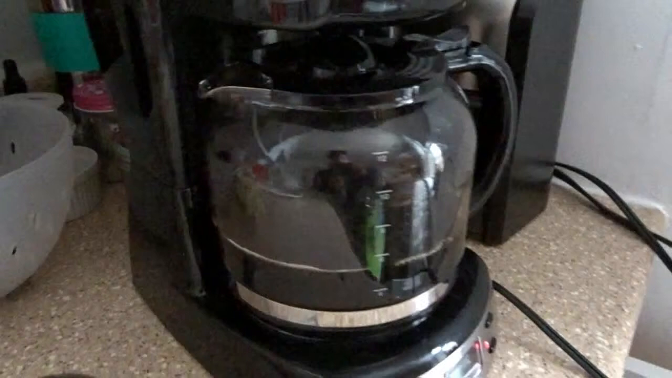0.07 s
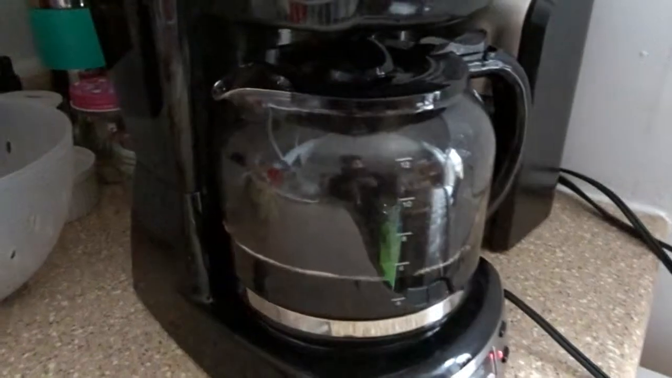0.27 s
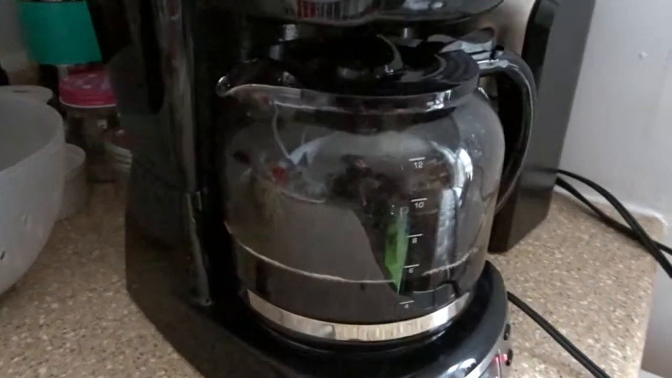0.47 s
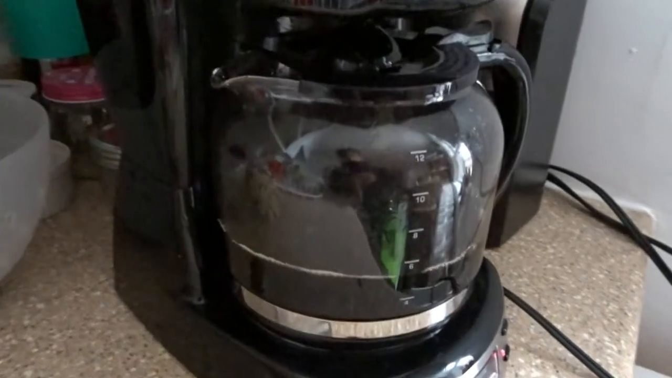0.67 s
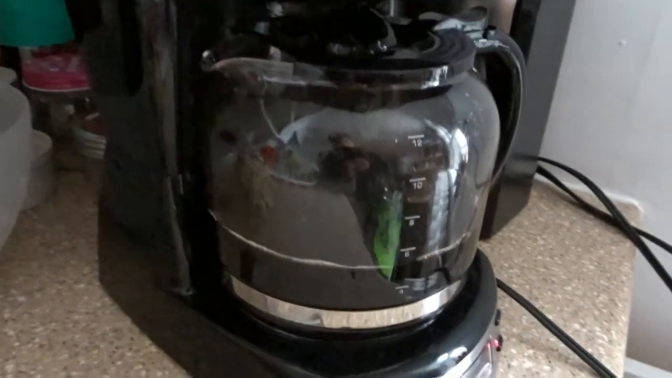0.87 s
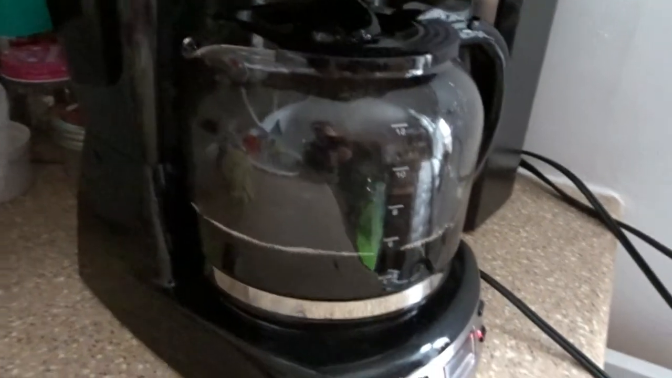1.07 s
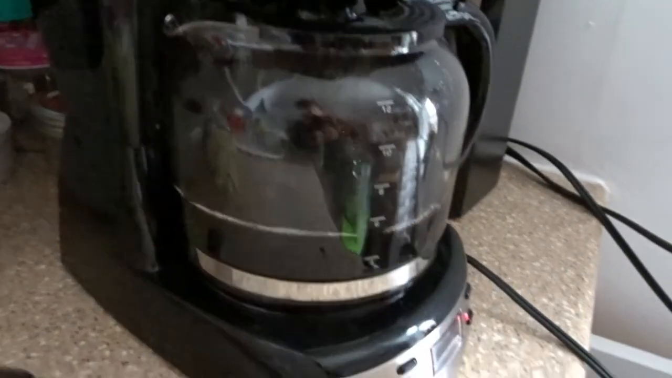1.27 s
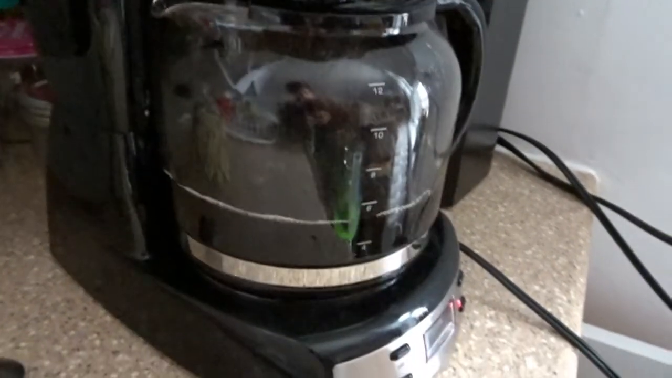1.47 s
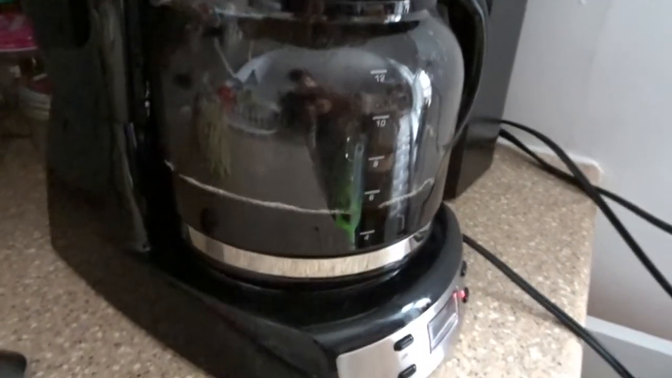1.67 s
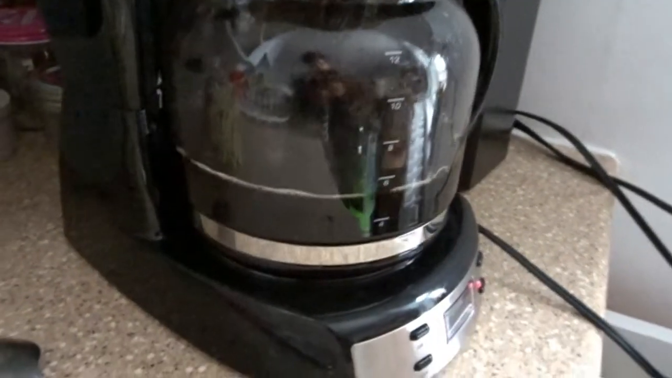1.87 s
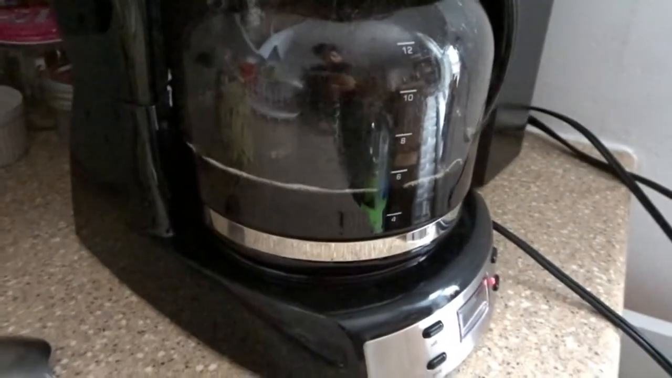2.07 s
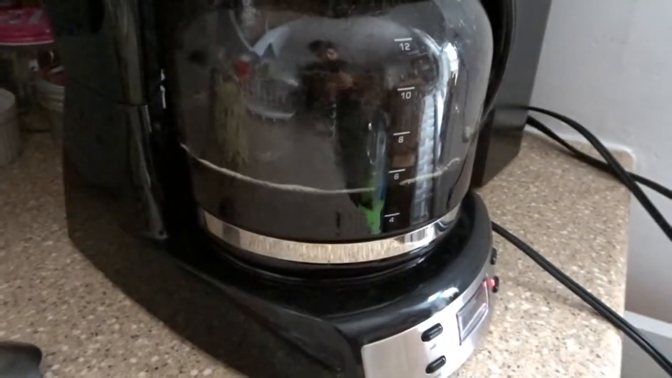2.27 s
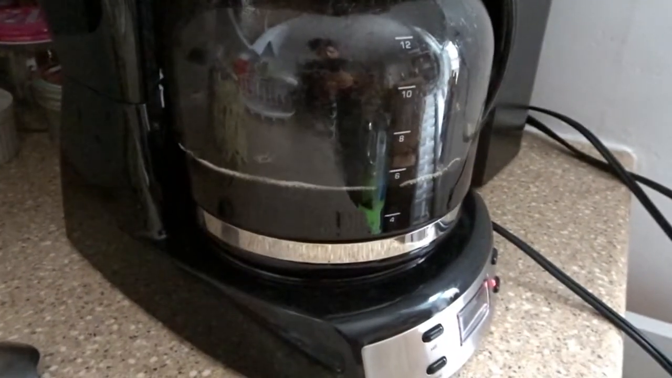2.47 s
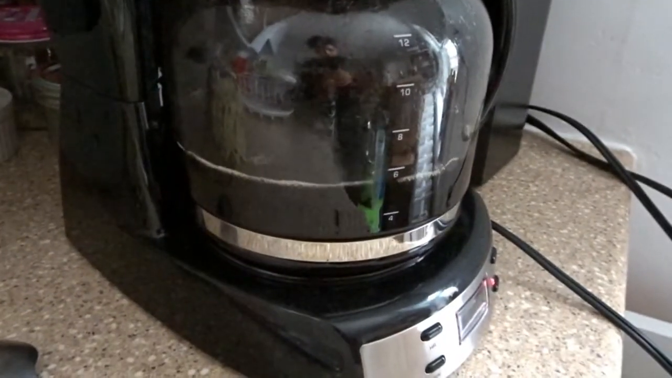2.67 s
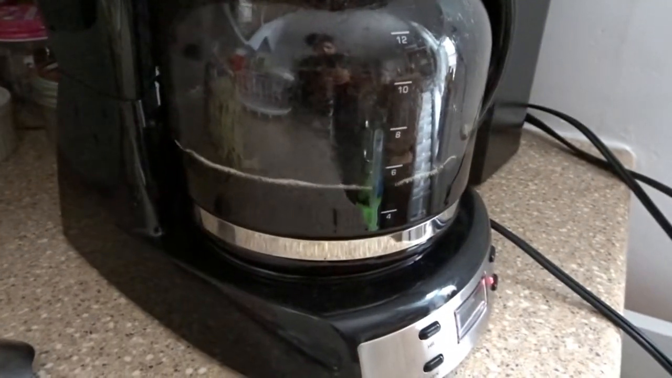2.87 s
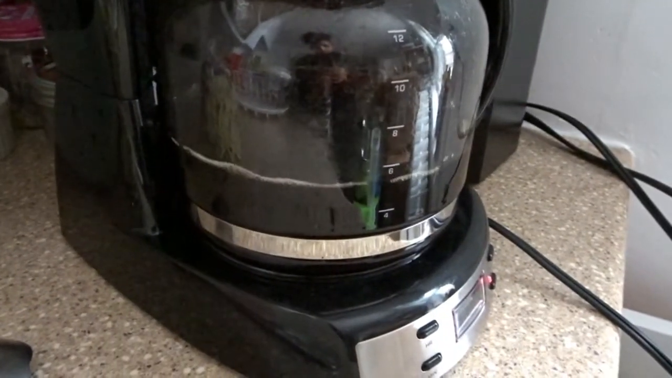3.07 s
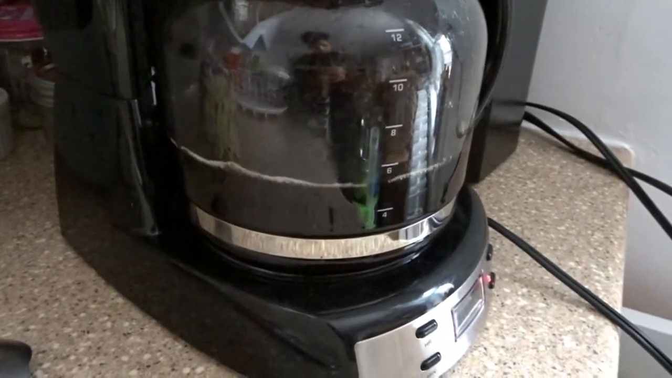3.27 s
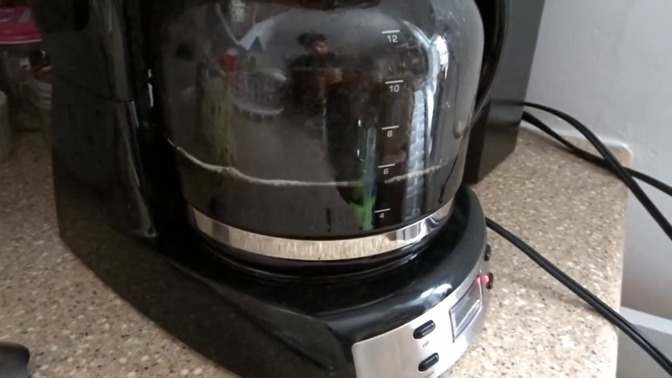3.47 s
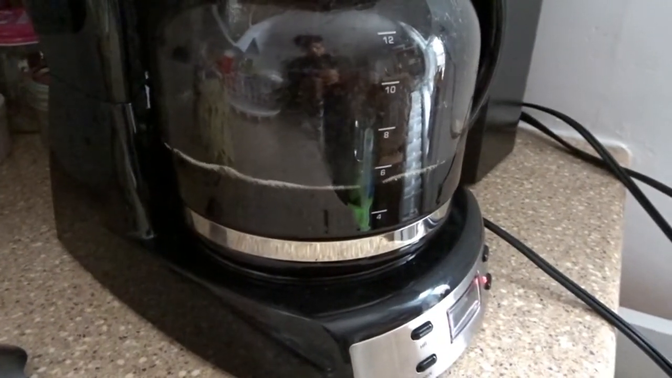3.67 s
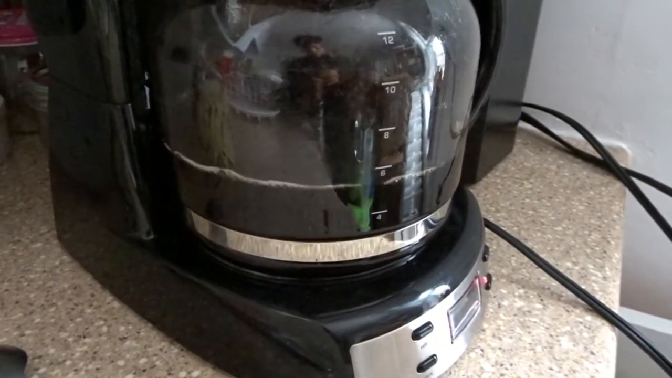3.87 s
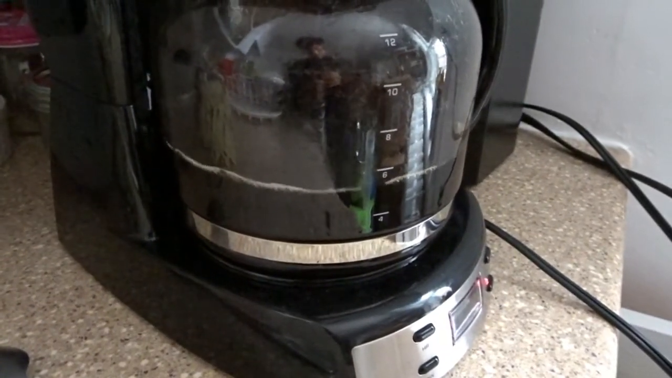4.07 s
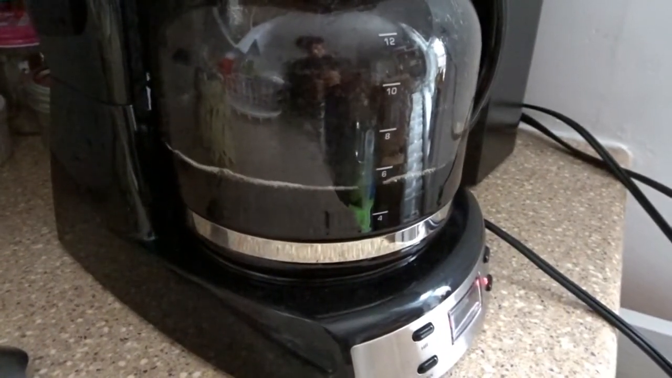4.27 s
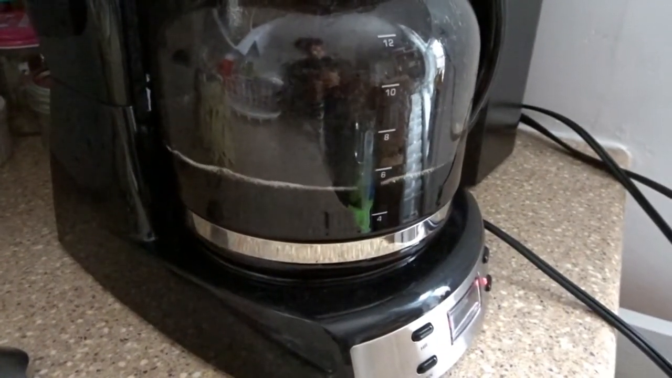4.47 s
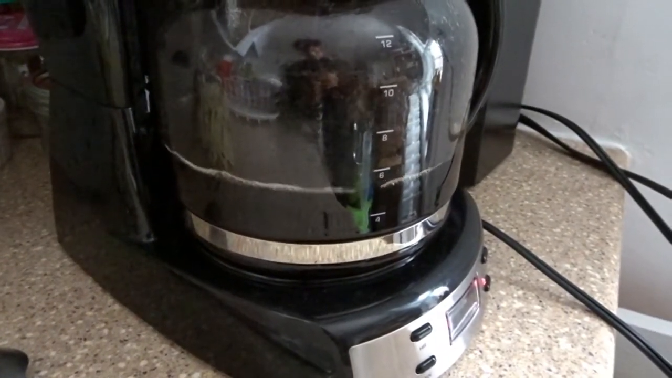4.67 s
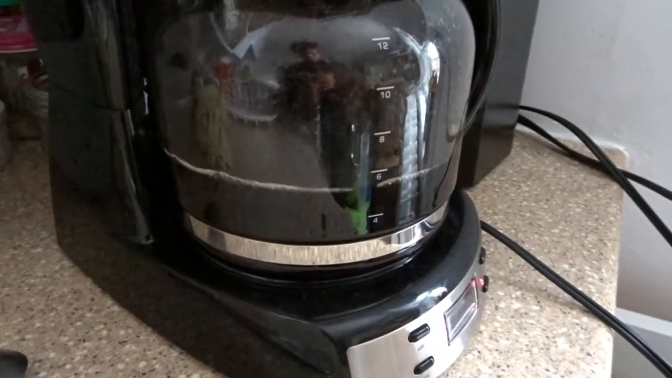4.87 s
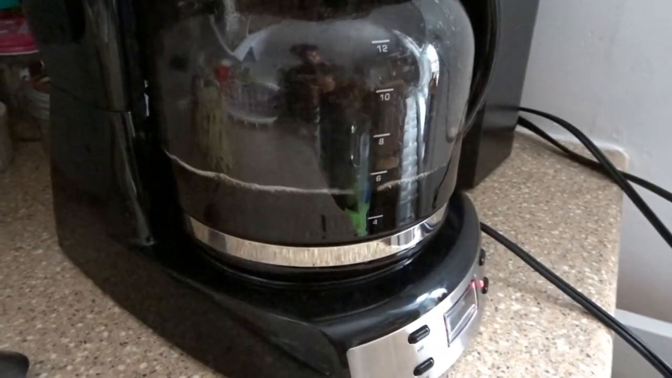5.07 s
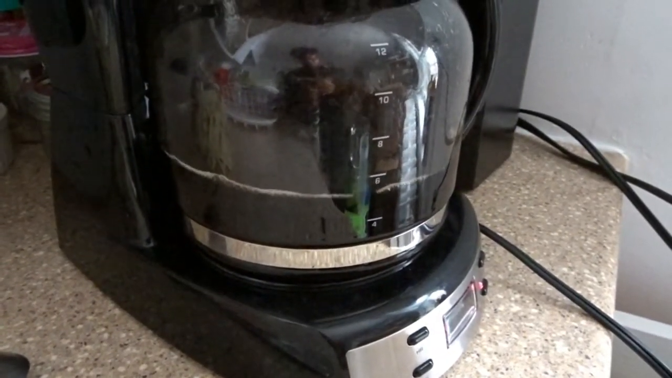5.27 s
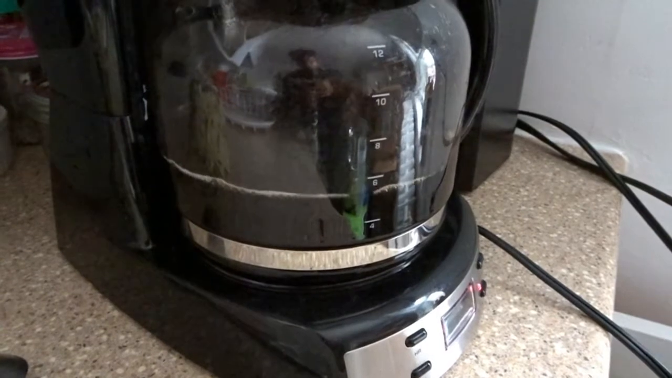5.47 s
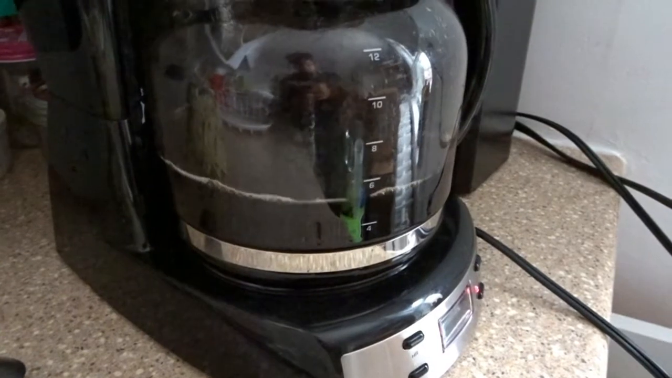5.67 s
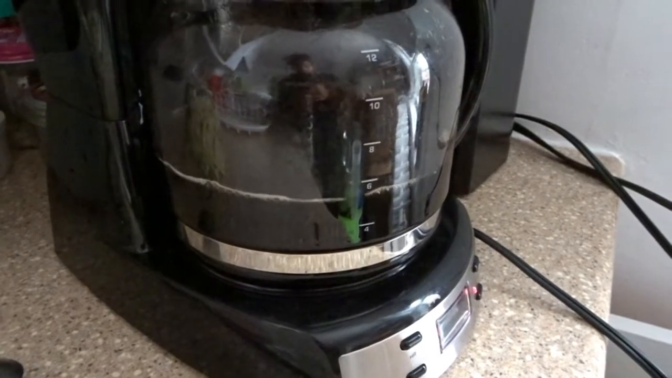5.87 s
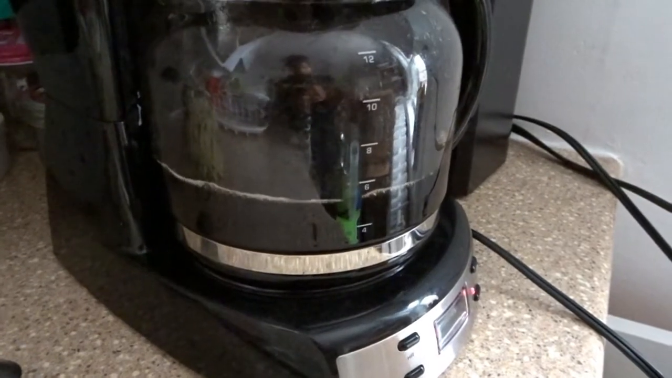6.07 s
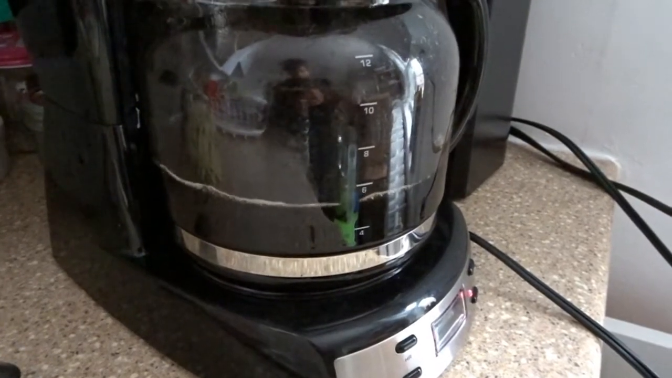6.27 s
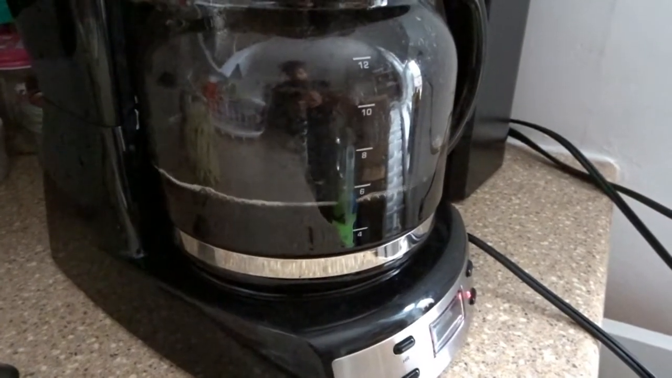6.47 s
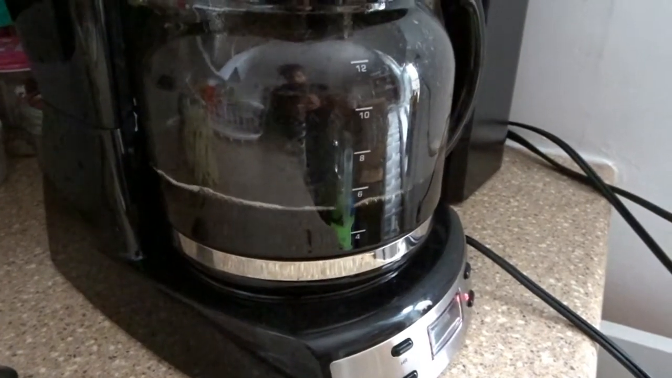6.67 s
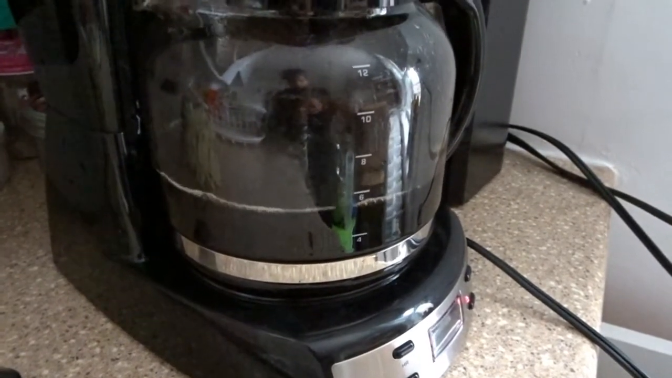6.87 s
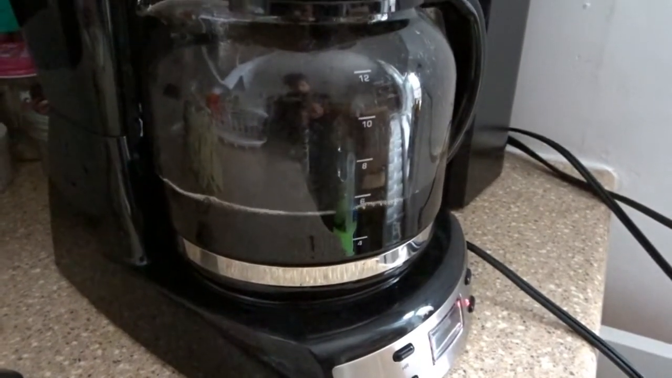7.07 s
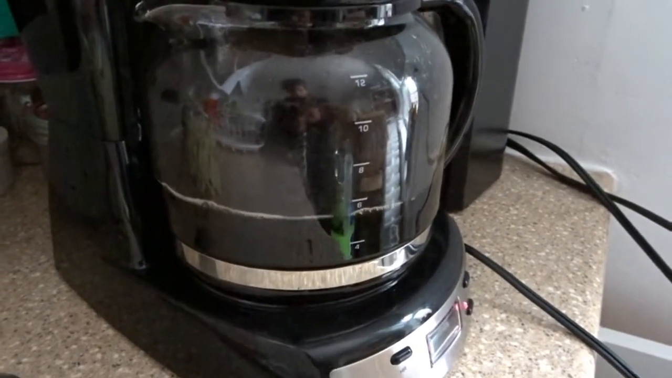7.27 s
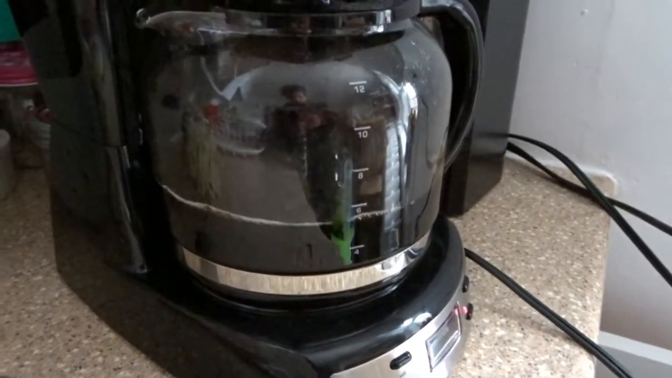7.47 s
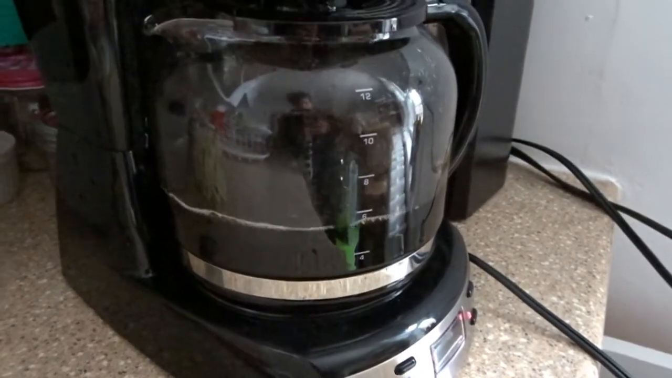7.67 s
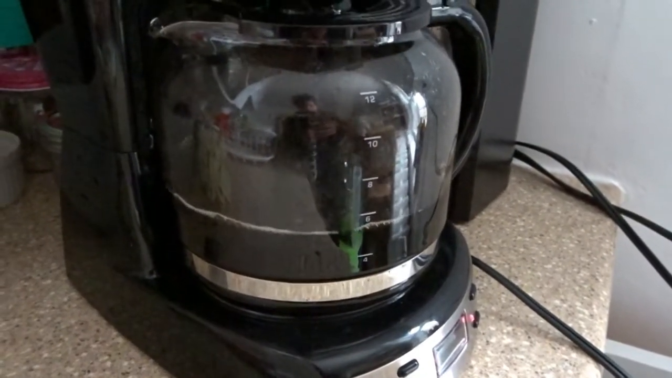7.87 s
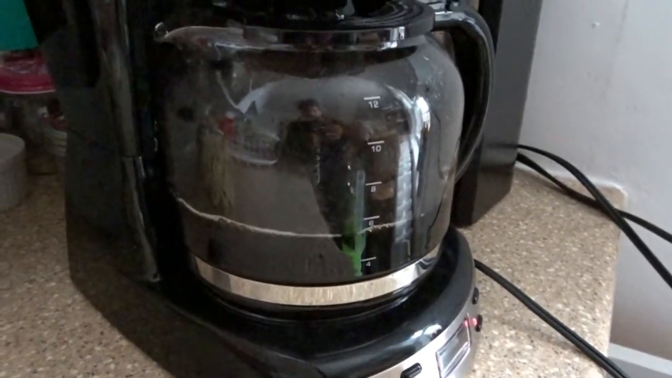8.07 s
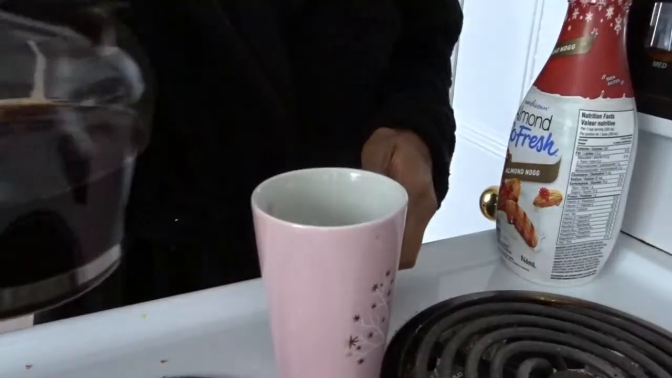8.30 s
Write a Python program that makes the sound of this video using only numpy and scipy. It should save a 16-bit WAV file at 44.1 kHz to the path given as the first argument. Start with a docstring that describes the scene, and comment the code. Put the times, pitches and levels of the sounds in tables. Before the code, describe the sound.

A drip coffee maker is brewing close to the microphone on a kitchen counter, with very little echo. A low, churning boil resonates in its hollow plastic housing from the start and slowly grows a little louder. Sharp, knocking pops cluster between 0.5 and 1.5 seconds, with soft glugs underneath. Small drips plink into the carafe and droplets make faint high spits throughout. From about 2.2 seconds, short steam puffs join in. A fine sizzle swells around 3.2 seconds, leading to a strong pop at 3.6. From 4 seconds a thin steam hiss rises and the glugs and puffs come thickly. The sizzle swells again, with a hard pop at 5.2 and the loudest at 5.5. After 6 seconds the sputtering eases to drips and soft glugs over the drone and hiss. At 8.1 seconds the machine cuts off abruptly, leaving a moment of quiet, rumbling room tone.

```python
"""A low, churning drone with sharp pops and soft glugs: a drip coffee maker brewing on a kitchen counter,
close to a small stereo microphone. Steam bubbles collapse in the heater tube and shake the hollow
plastic housing at its resonances. Steam hisses up the riser and puffs under the lid; droplets spit on
hot parts and plink into the carafe. At the end the sound cuts off abruptly; a room tone with louder
low rumble follows the cut."""
import sys
import numpy as np
from scipy import signal
from scipy.fft import rfft, irfft, next_fast_len
from scipy.io import wavfile
from scipy.ndimage import uniform_filter1d, map_coordinates

SR = 44100
rng = np.random.default_rng(int(sys.argv[2]) if len(sys.argv) > 2 else 0)


def int16_out(signal):
    """Quantize to a 16-bit WAV file."""
    q = np.round(np.clip(np.atleast_2d(signal).T, -1, 1) * 32767)
    wavfile.write(sys.argv[1], SR, q.astype(np.int16))


N = 367529
START_S, CUT_S = 0.074, 8.112  # fade-in; abrupt cut to room tone

# resonances of the machine's parts: freq_hz, width_hz, gain_db
BASE_MODES = [(50, 29, -14.5), (111.8, 22, -4.5), (153, 32, -6), (223.5, 9.9, -8)]
TANK_MODES = [(296, 32, 0), (255, 40, -12)]
WALL_MODES = [(639, 32, 3), (699, 59, -4.5), (759, 28.5, -8.5), (960, 41.6, -8.5), (1055, 48, -10),
              (1264, 58, -12), (1436.5, 41, -5), (1626, 18, -24.5)]
LID_MODES = [(1848, 33.6, 4), (1988, 20, 2.5), (2386, 200, 1), (2630, 126, 4.5), (2813, 42, 5.5),
             (3590, 30, -1.5), (3850, 200, -10.5), (4344, 190, -2), (4510, 46, -3), (4580, 14, 6.5),
             (4780, 64, 0), (4950, 220, -2), (5400, 98, -5.5), (5630, 24, -0.5)]
RISER_MODES = [(1428.6, 42, 3), (1615, 15, -11), (2612, 36, -10), (3820, 130, -27), (4670, 31, -33),
               (5026, 74, -16), (5450, 116, -17.5)]
MOUTH_MODES = [(6570, 150, -3.5), (6750, 110, 0), (6980, 154, 0)]
SPRAY_HEAD_MODES = [(8520, 200, -5.5), (9100, 270, -3.5), (10800, 160, -9)]
LEAK_MODES = [(4536, 70, 0), (5280, 70, -12), (5750, 52, -10)]
THUD_MODES = [(464, 130, -20), (960, 680, 5.5), (1910, 250, 1.5), (3420, 5000, -29)]  # first instants of a blow, before the ringing forms
FROTH_MODES = [(924, 51, -1.5), (1080, 104, -3), (2520, 750, -15), (4250, 3500, -25)]
# bands the housing radiates poorly: freq_hz, width_hz, share_removed
NOTCHES = [(391, 125, 0.54), (726, 21, 0.57), (2246, 200, 0.05), (2830, 240, 0.44), (4245, 205, 0.7),
           (6100, 350, 0)]

# room noise spectrum: freq_hz, density_db
ROOM_SPECTRUM = [(24, -48), (40, -30), (52, -22), (100, -17), (140, -10), (200, -15), (450, -22),
                 (900, -26.5), (2000, -29.5), (12000, -50), (15500, -59)]
# steady boiling: time_s, walls_db, base_db, tank_db
BOIL_LEVELS = [(0.25, -52, -60, -49.5), (0.38, -48.5, -53, -49.5), (1.02, -48.5, -51, -46.5),
               (1.56, -49.5, -52, -48.5), (2.45, -47.5, -49, -47), (2.66, -47, -54.5, -49),
               (3.64, -46.5, -51.5, -45.5), (5.93, -42.5, -47.5, -44), (6.66, -44, -47.5, -45.5),
               (7.31, -43, -49.5, -46.5), (7.91, -44, -47.5, -44.5), (8.0, -46.5, -49, -44.5)]
# steam hiss: time_s, mouth_db, spray_head_db, leak_db
HISS_LEVELS = [(0.2, -75, -87, -61.5), (1.5, -76, -81, -69), (2.7, -79, -81, -72), (4.0, -68, -80, -80),
               (4.25, -63.5, -67, -76), (5.2, -66.5, -71.5, -80), (5.75, -60.5, -64.5, -76),
               (6.3, -64, -73, -78), (8.0, -61, -77, -83)]
# droplets on hot parts: start_s, level_db, centre_hz
SPIT_EVENTS = [(0.127, -52, 7250), (.3501, -50, 11000), (1.1139, -57, 11000), (1.4287, -46, 9800),
               (1.7744, -51, 8400), (1.986, -54, 8000), (2.37, -42.5, 8160), (2.4184, -48, 9500),
               (2.54, -45.5, 10100), (3.282, -52, 9600), (3.6501, -49, 7900), (3.939, -47.5, 9000),
               (4.0667, -46.5, 10000), (4.16, -45, 8800), (4.1994, -51, 10000), (4.5594, -59, 9000),
               (4.7037, -48, 10000), (5.666, -37.5, 7760), (5.7997, -46.5, 8000), (5.9668, -43, 8050),
               (6.7564, -58, 9000), (6.9222, -50, 9100), (7.005, -52, 8500), (7.1094, -52, 7600),
               (7.241, -44, 7750), (7.9553, -54, 10000)]
# drops into the carafe: start_s, level_db, pitch_hz
DRIP_EVENTS = [(0.165, -46, 3860), (.429, -37.5, 1020), (1.429, -32.5, 2500), (1.776, -38.5, 2800),
               (1.989, -47, 5710), (2.376, -36, 4430), (2.875, -40.5, 2380), (2.982, -42.5, 2510),
               (3.29, -48.5, 3090), (3.937, -40.5, 3690), (4.177, -42.5, 3080), (5.967, -28.5, 2445),
               (6.462, -35, 1015), (6.728, -43, 2750), (6.764, -34, 1584), (7.022, -39.5, 1650),
               (7.108, -42, 2660), (7.638, -43.5, 1950)]
# sharp bubble collapses: start_s, level_db, lid_vs_walls_db
POP_EVENTS = [(0.351, -35.5, -24), (0.471, -25, -11), (0.528, -20, -5), (0.631, -36.5, -5),
              (0.821, -39, -32), (0.916, -32.5, -37), (0.958, -26, -13), (0.997, -17.5, -11),
              (1.139, -25.5, -2), (1.458, -28, -7), (1.64, -36.5, -2), (2.209, -38, -13),
              (2.288, -37.5, -3), (2.468, -36, -1), (3.587, -17, 1), (3.686, -36, -6), (3.754, -46.5, 8),
              (3.824, -40, -21), (4.001, -44, -15), (4.159, -27, 0.5), (4.385, -34, -18), (4.471, -32, -12),
              (4.618, -32, -2), (4.899, -30.5, -5), (5.152, -32, -20), (5.225, -18.5, -10),
              (5.273, -28.5, -5), (5.455, -35, -31), (5.496, -14, 1.5), (5.578, -23.5, 1),
              (6.563, -36.5, -17), (7.956, -31, -8)]
# slugs of water: start_s, level_db, tank_vs_base_db
GLUG_EVENTS = [(0.354, -44.5, 9.5), (0.47, -36, -1), (0.526, -37, -1), (0.914, -34, 4.5), (0.994, -34, -14),
               (1.137, -38, 5), (1.459, -42, -7), (1.786, -43, 8), (2.434, -35.5, 2.5), (2.864, -37.5, -3),
               (3.033, -35, -1), (3.246, -40, -2), (3.453, -41, -6), (3.535, -34, -5), (3.585, -31, -15),
               (3.817, -35, -29), (3.895, -33.5, -7), (4.0, -34, -8), (4.156, -35.5, 6.5),
               (4.214, -35.5, -17), (4.379, -33.5, 2), (4.465, -30, -10), (4.562, -35, 4),
               (4.612, -32, -18), (4.664, -32.5, 3), (4.748, -40, -7), (4.811, -41, 5), (4.896, -32.5, -6),
               (4.973, -30.5, -11), (5.061, -36.5, -1), (5.145, -30, 1), (5.222, -33, -11),
               (5.265, -31, -21), (5.343, -36, -2), (5.41, -32, -18), (5.447, -37, -17), (5.495, -33, 1),
               (5.571, -32, -12), (5.639, -42, 3), (5.7, -36, 4.5), (5.8, -35, -3), (5.916, -37.5, -2),
               (6.435, -46, 12), (6.497, -43.5, 10.5), (6.854, -44.5, 13.5), (6.905, -41.5, 6.5),
               (7.233, -45, -5), (7.361, -38, -5), (7.394, -35, -12), (7.479, -39.5, 4), (7.545, -35, -6),
               (7.739, -34, -11), (7.799, -39, -3), (7.87, -43, -13), (7.949, -35, -13)]
# steam and spray under the lid: start_s, level_db
PUFF_EVENTS = [(0.6559, -40), (0.8405, -46), (2.2468, -43), (2.3191, -42), (2.4394, -35), (2.5331, -38),
               (2.6858, -47), (2.8424, -40), (3.0694, -38), (3.1193, -44), (3.1594, -41), (3.5204, -46),
               (3.7015, -40), (3.7529, -42), (3.8207, -45), (3.8514, -47), (3.901, -45), (4.2178, -37),
               (4.3844, -39), (4.4694, -40), (4.4987, -39), (4.5605, -33), (4.6124, -36), (4.6633, -36),
               (4.8274, -43), (4.8993, -42), (4.9786, -33), (5.1422, -38), (5.2669, -34), (5.3494, -37),
               (5.4151, -40), (5.7254, -33), (5.8067, -37), (6.0247, -36)]
# sizzling before the big pops: centre_s, half_length_s, level_db
SIZZLE_SWELLS = [(3.25, 0.52, -50), (5.2, 0.56, -53.5)]

# sound that differs between the microphone ports: freq_hz, side_gain_db
SIDE_SPECTRUM = [(60, -28), (110, -31), (200, -27), (380, -25), (700, -19), (1290, -12), (2380, -12.5),
                 (4400, -5), (8120, -2), (15000, -1)]
# stereo balance: freq_hz, left_minus_right_db
BALANCE = [(60, 0), (500, .2), (1290, 2), (2380, .5), (4400, -.5), (8120, -1.2), (15000, -.4)]


def amp(db):
    return 10 ** (np.asarray(db) / 20)


def unit_rms(x):
    return x / np.sqrt(np.mean(x ** 2) + 1e-20)


def curve_db(points, hz):
    """Interpolate (freq_hz, db) points on a log axis."""
    freq_hz, db = np.transpose(points)
    return np.interp(np.log(hz + 1), np.log(freq_hz + 1), db)


def wobble(rate_hz):
    """Smooth random curve."""
    knots = rng.standard_normal(int(N * rate_hz / SR) + 4)
    return map_coordinates(knots, [np.arange(N) * rate_hz / SR])


def crackle(rate_hz, spread_db, life_s):
    """Envelope of many small collapses: random sharp starts, exponential decays."""
    starts = (rng.random(N) < rate_hz / SR) * amp(spread_db * rng.exponential(size=N))
    return unit_rms(signal.lfilter([1], [1, -np.exp(-1 / (life_s * SR))], starts))


def filtered(x, response):
    """Apply a complex frequency response."""
    size = next_fast_len(N + SR // 2)
    return irfft(rfft(x, size) * response(np.fft.rfftfreq(size, 1 / SR)), size)[..., :N]


def resonances(modes):
    """Response of parallel resonators of alternating sign."""
    return lambda hz: sum((-1) ** k * amp(db) * 1j * hz * width / (centre**2 - hz**2 + 1j * hz * width)
                          for k, (centre, width, db) in enumerate(modes))


def driven(drive, modes):
    """Noise-driven ringing at unit RMS."""
    return unit_rms(filtered(drive, resonances(modes)))


def struck(blows, modes, damping=0.7, min_width_hz=1):
    """Ringing that peaks at 1 for a unit blow; damping by wet walls scales the mode widths."""
    damped = []
    for hz, width_hz, db in modes:
        widening = max(min_width_hz / (width_hz * damping), 1)
        damped.append((hz, width_hz * damping * widening, db - 20 * np.log10(widening)))
    response = resonances(damped)
    peak = np.abs(irfft(response(np.fft.rfftfreq(SR // 2, 1 / SR)))).max()
    return filtered(blows, response) / peak


def room_tone(level_db=-60, rise_db=10):
    """Smooth hiss and an uneven low rumble, louder after the cut."""
    noise = rng.standard_normal((2, N))
    air = amp(level_db) * unit_rms(filtered(noise, lambda hz: amp(curve_db(ROOM_SPECTRUM, hz))))
    rumble = filtered(air, lambda hz: 1 / (1 + (hz / 700) ** 4))
    after_cut = np.clip((np.arange(N) / SR - CUT_S) / 0.08, 0, 1)
    return air - rumble + rumble * amp(1.7 * wobble(15) + rise_db * after_cut)


def boiling(seep_db_per_s=1.5, blow_s=4.04, blow_db=-48.5):
    """Churning bubbles drive the housing; steam seeps up the riser, then blows. Rows: mid, side."""
    t = np.arange(N) / SR
    time_s, *levels_db = np.transpose(BOIL_LEVELS)
    walls_db, base_db, tank_db = (np.interp(t, time_s, db) for db in levels_db)
    lid_db = walls_db.mean() - 8.5 + 0.87 * (walls_db - walls_db.mean())
    steam_db = -64.5 + seep_db_per_s * t
    steam_db += (blow_db - steam_db) * np.clip((t - blow_s) / 0.062, 0, 1)
    surge = amp(0.21 * wobble(10) + 0.19 * wobble(28))
    churn = crackle(rate_hz=350, spread_db=0.5, life_s=0.0081)

    def part(db, modes, steady):
        return amp(db) * driven(surge * (churn + steady) * rng.standard_normal((2, N)), modes)

    return (part(base_db, BASE_MODES, steady=1.1)
            + part(tank_db, TANK_MODES, steady=1.0)
            + part(walls_db, WALL_MODES, steady=0.88)
            + part(lid_db, LID_MODES, steady=1.0)
            + part(steam_db, RISER_MODES, steady=0.75))


def steam_hiss():
    """Steam sings in the riser mouth, the spray head and a thin leak."""
    out, t = np.zeros((2, N)), np.arange(N) / SR
    time_s, *levels_db = np.transpose(HISS_LEVELS)
    flicker = crackle(rate_hz=190, spread_db=2.3, life_s=0.0094) + 0.8
    for db, modes in zip(levels_db, [MOUTH_MODES, SPRAY_HEAD_MODES, LEAK_MODES]):
        out += amp(np.interp(t, time_s, db)) * driven(flicker * rng.standard_normal((2, N)), modes)
    return out


def spits(rise_s=0.0024, t60_s=0.037):
    """A droplet flashes to steam: a broad tick of treble noise."""
    out, t = np.zeros(N + SR), np.arange(SR // 10) / SR
    hz = np.fft.rfftfreq(len(t), 1 / SR)
    for start_s, db, centre_hz in SPIT_EVENTS:
        band = np.exp(-(np.log((hz + 1) / centre_hz) / 0.34) ** 2)
        noise = unit_rms(irfft(rfft(rng.standard_normal(len(t))) * band, len(t)))
        envelope = amp(db - 60 * t / t60_s) * (1 - np.exp(-t / rise_s))
        out[round(start_s * SR):][:len(t)] += envelope * noise
    return out[:N]


def drips(rise_s=0.0013, t60_s=0.07):
    """A drop splashes and traps a bubble, rising slightly in pitch, with fainter ones around it."""
    out, t = np.zeros(N + SR), np.arange(SR // 8) / SR
    for start_s, db, pitch_hz in DRIP_EVENTS:
        jitter_rad = 0.07 * (pitch_hz / 2500) ** 2  # small bubbles hold pitch badly
        drift_rad = np.cumsum(rng.normal(0, jitter_rad, len(t)))
        phase = 2 * np.pi * pitch_hz * (t + 0.15 * t * t) + drift_rad
        neighbours = 0.35 * np.sin(rng.uniform(0.9, 1.15, (3, 1)) * phase).sum(axis=0)
        splash = 1.06 * amp(-60 * t / 0.046) * uniform_filter1d(rng.standard_normal(len(t)), size=4)
        envelope = amp(db - 60 * t / t60_s) * (1 - np.exp(-t / rise_s))
        out[round(start_s * SR):][:len(t)] += envelope * (np.sin(phase) + neighbours + splash)
    return out[:N]


def pops(ragged_s=0.0042, spray_s=0.026, knock_hz=823, knock_rise_s=0.00083, knock_delay_s=0.00058):
    """A steam bubble collapses: one hard blow, a ragged tail and slower spray ring the housing."""
    blows, t = np.zeros((4, N + SR)), np.arange(SR // 12) / SR
    age_s = np.maximum(t - knock_delay_s, 0)
    first_swing = age_s / knock_rise_s * np.exp(1 - age_s / knock_rise_s)
    first_swing *= np.sin(2 * np.pi * knock_hz * age_s)
    tail = 0.063 * np.exp(-t / ragged_s) + 0.023 * np.exp(-t / spray_s)
    for start_s, db, lid_db in POP_EVENTS:
        blow = tail * rng.standard_normal(len(t))
        blow[0] = -1
        blow[rng.integers(40, 550, size=3)] -= 0.25 * rng.random(3)  # smaller bubbles follow
        tank, walls, lid, knock = blows[:, round(start_s * SR):][:, :len(t)]
        tank[0] -= amp(db - 6)
        walls += amp(db) * blow
        lid += amp(db + lid_db) * blow
        knock -= amp(db - 1.5) * first_swing
    tank, walls, lid, knock = blows[:, :N]
    body = knock + struck(tank, TANK_MODES, damping=0.62)
    body += amp(-1) * struck(walls, WALL_MODES, damping=1.9) + amp(-5.5) * struck(walls, THUD_MODES)
    top = struck(lid, LID_MODES, damping=2.1, min_width_hz=197)
    top += amp(-13.5) * struck(lid, MOUTH_MODES + SPRAY_HEAD_MODES, damping=0.98)
    return filtered(body + top, lambda hz: 1 / (1 + 1j * hz / 6500) ** 3)  # water blunts the blow


def glugs(delay_s=0.007, walls_vs_tank_db=9, lowpass_hz=400):
    """Slugs of water push softly on base, tank and walls."""
    base, tank, walls = np.zeros((3, N))
    start_s, db, tank_db = np.transpose(GLUG_EVENTS)
    onsets = np.round((start_s + delay_s) * SR).astype(int)
    base[onsets] = -amp(db)
    tank[onsets] = -amp(db + tank_db)
    walls[onsets] = -amp(db + tank_db + walls_vs_tank_db)
    body = struck(base, BASE_MODES) + struck(tank, TANK_MODES, damping=0.38)
    body += struck(walls, WALL_MODES, damping=0.86)
    return filtered(body, lambda hz: 1 / (1 + 1j * hz / lowpass_hz) ** 2)


def puffs(rise_s=0.0029, t60_s=0.093, trim_db=-8):
    """Bursts of steam and spray ring the lid, riser mouth and froth."""
    envelope, t = np.zeros(N + SR), np.arange(SR // 8) / SR
    for start_s, db in PUFF_EVENTS:
        burst = amp(db + trim_db - 60 * t / t60_s) * (1 - np.exp(-t / rise_s))
        envelope[round(start_s * SR):][:len(t)] += burst
    steam = sum(amp(db) * driven(rng.standard_normal((2, N)), modes)
                for db, modes in [(0, LID_MODES), (-12.5, MOUTH_MODES), (-7, FROTH_MODES)])
    return envelope[:N] * steam


def sizzle():
    """A froth of fine bubbles swells and fades."""
    t = np.arange(N) / SR
    swell = sum(amp(db) * np.exp(-((t - centre_s) / half_s) ** 2)
                for centre_s, half_s, db in SIZZLE_SWELLS)
    bubbles = crackle(rate_hz=250, spread_db=1.0, life_s=0.005) + 0.63
    return swell * driven(bubbles * rng.standard_normal((2, N)), FROTH_MODES)


def echoes(x, t60_s):
    """Nearby walls and counter: a short noise tail, new for each block."""
    out, t, block = np.zeros(N + SR), np.arange(SR // 5) / SR, SR // 8
    for i in range(0, N, block):
        tail = rng.standard_normal(len(t)) * amp(-60 * t / t60_s)
        wet = signal.fftconvolve(x[i:i + block], tail / np.linalg.norm(tail))
        out[i:i + len(wet)] += wet
    return out[:N]


def housing_response(hz):
    """The plastic dulls the treble and leaves notches between its resonances."""
    notches = [1 - share * 1j * hz * width / (centre**2 - hz**2 + 1j * hz * width)
               for centre, width, share in NOTCHES]
    return np.prod(notches, axis=0) / (1 + 1j * hz / 9000) ** 2


def scene():
    """Machine and room, mixed as mid and side, returned as left and right."""
    t = np.arange(N) / SR
    hits = pops() + glugs() + spits() + drips()
    machine = boiling()
    machine[0] += hits + amp(-12) * echoes(hits, t60_s=0.14)
    machine[1] += echoes(hits, t60_s=0.05)
    machine = filtered(machine + sizzle() + steam_hiss() + puffs(), housing_response)
    before_cut = np.clip((CUT_S - t) / 0.008, 0, 1)
    mid, side = machine * before_cut + room_tone()
    side = filtered(side, lambda hz: amp(curve_db(SIDE_SPECTRUM, hz)))
    stereo = np.array([mid + side, mid - side])
    stereo = filtered(stereo, lambda hz: amp(curve_db(BALANCE, hz) * [[0.5], [-0.5]]))
    return stereo * np.clip((t - START_S) / 0.042, 0, 1)


def record(dry):
    """Microphone bass roll-off and a hard band limit."""
    highpass_hz, top_hz = 45, 15600
    return filtered(dry, lambda hz: (1j * hz / (highpass_hz + 1j * hz)) ** 2 * (hz < top_hz))


dry = scene()
out = record(dry)
int16_out(out)
```